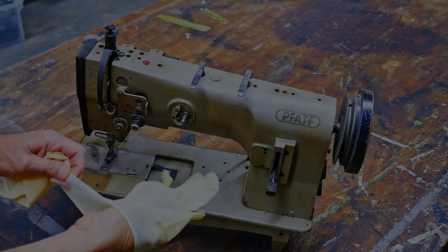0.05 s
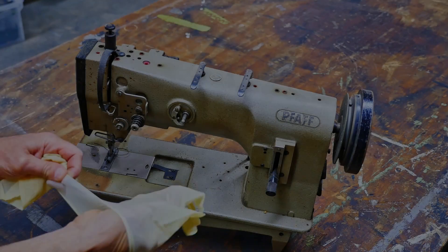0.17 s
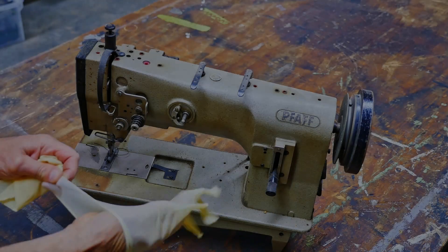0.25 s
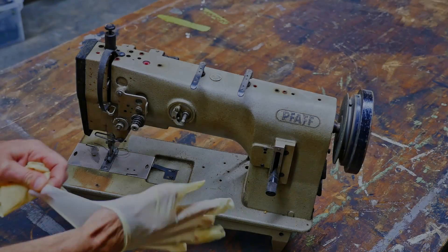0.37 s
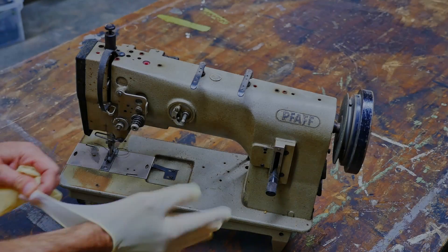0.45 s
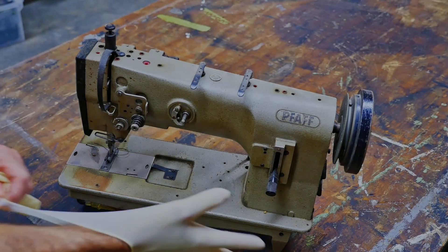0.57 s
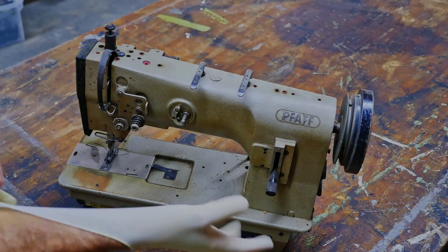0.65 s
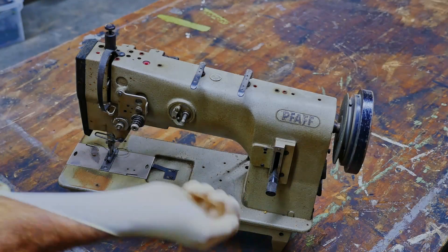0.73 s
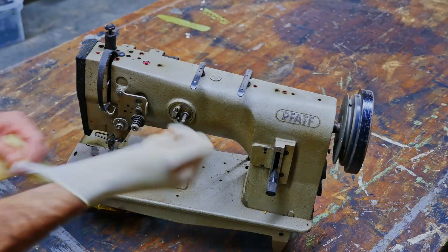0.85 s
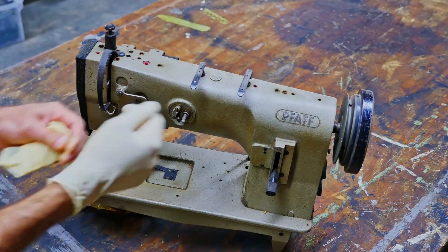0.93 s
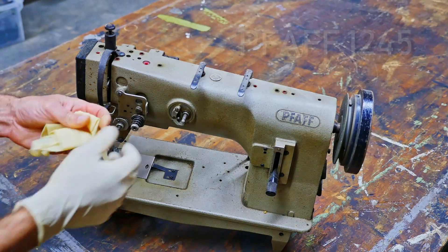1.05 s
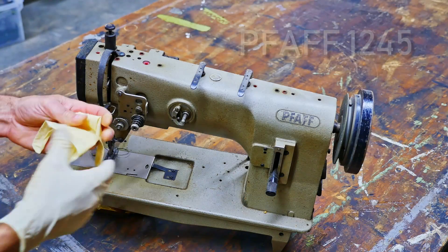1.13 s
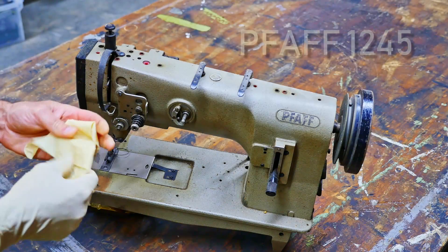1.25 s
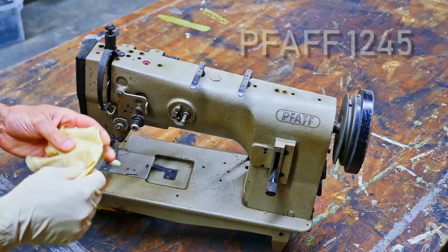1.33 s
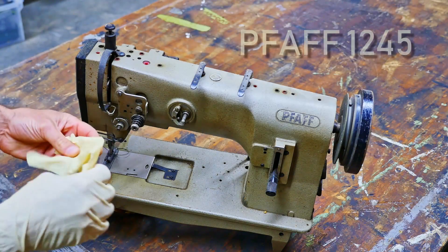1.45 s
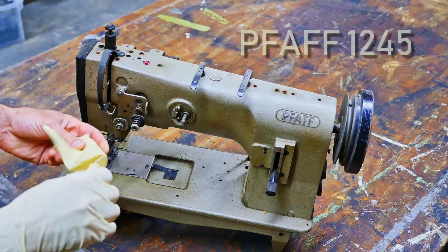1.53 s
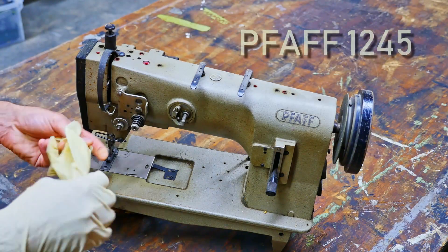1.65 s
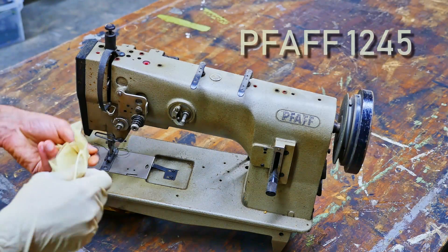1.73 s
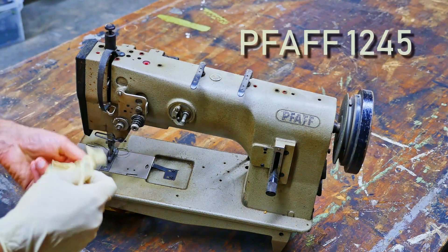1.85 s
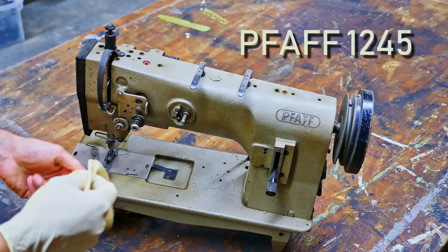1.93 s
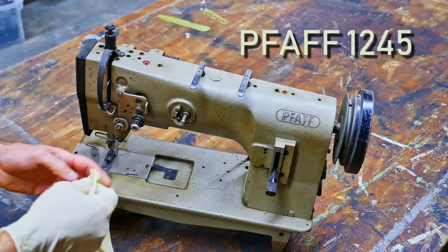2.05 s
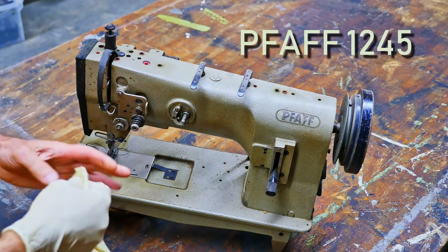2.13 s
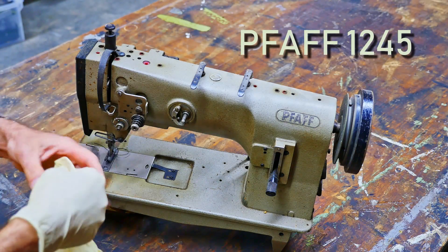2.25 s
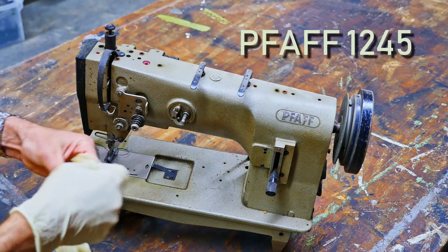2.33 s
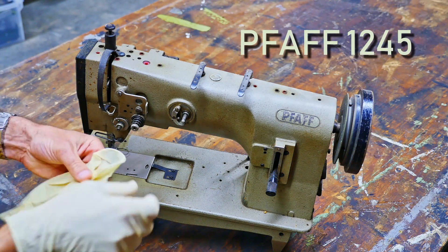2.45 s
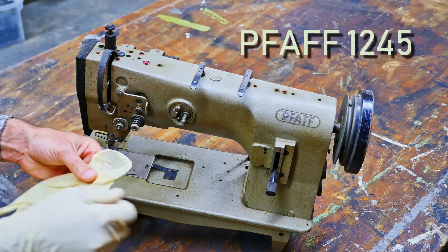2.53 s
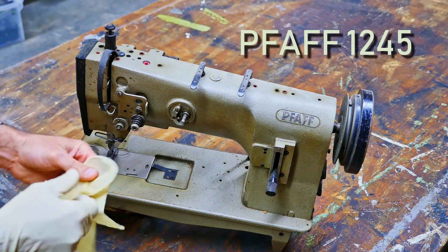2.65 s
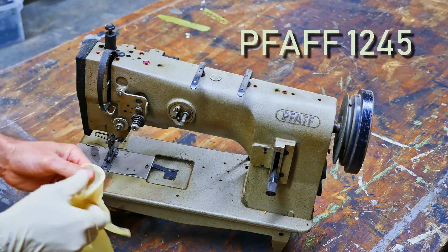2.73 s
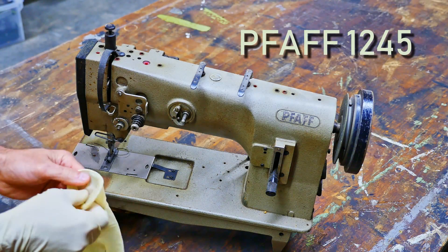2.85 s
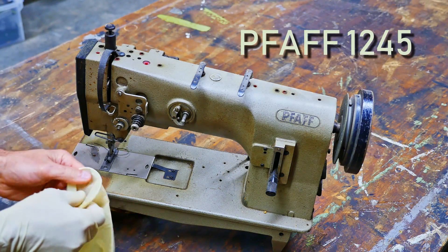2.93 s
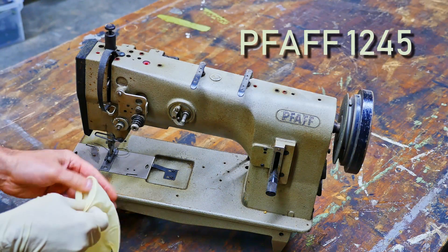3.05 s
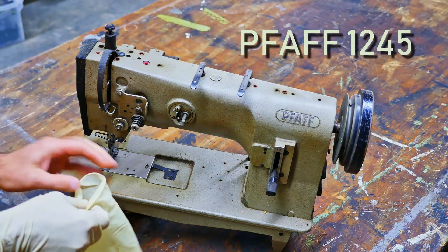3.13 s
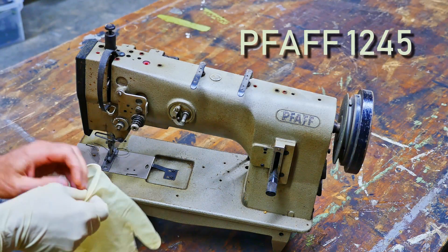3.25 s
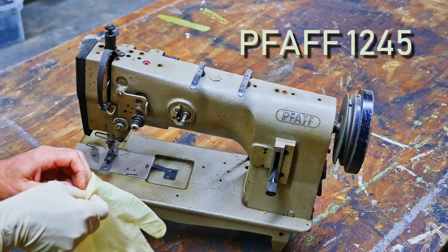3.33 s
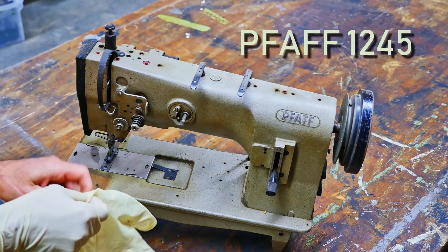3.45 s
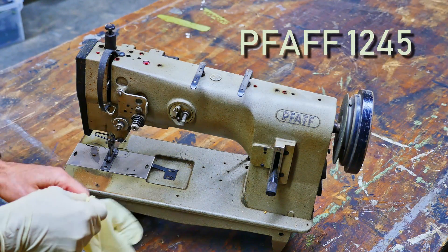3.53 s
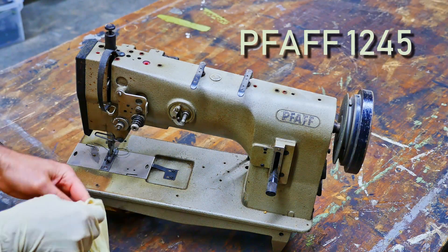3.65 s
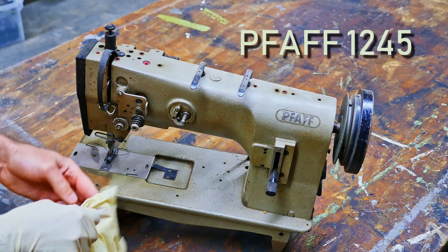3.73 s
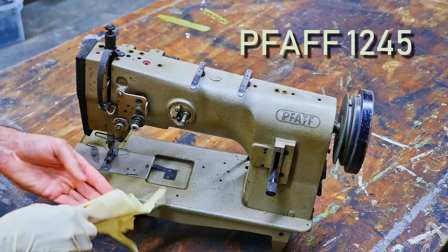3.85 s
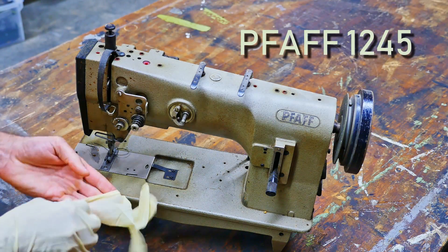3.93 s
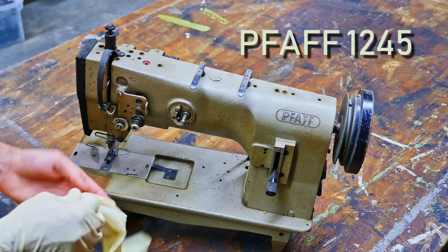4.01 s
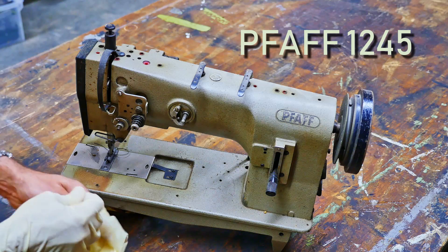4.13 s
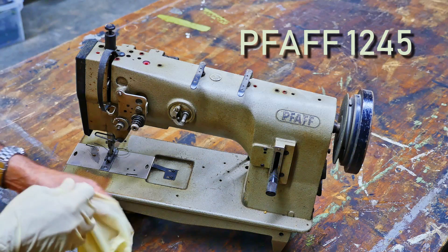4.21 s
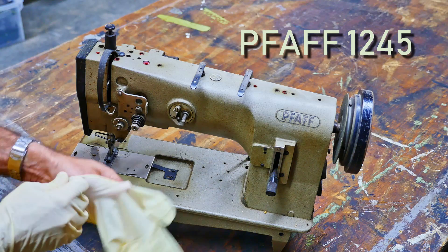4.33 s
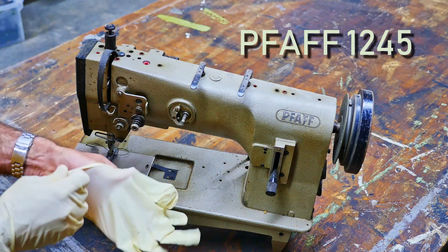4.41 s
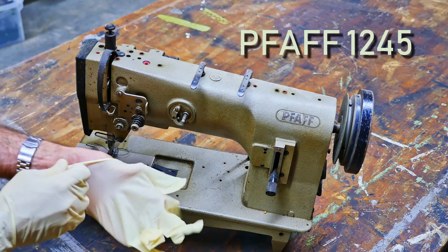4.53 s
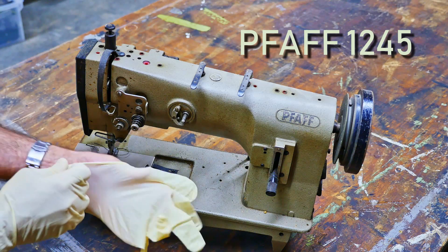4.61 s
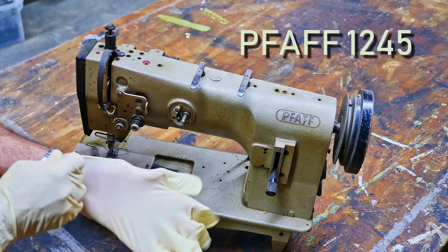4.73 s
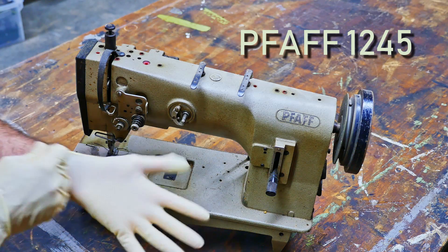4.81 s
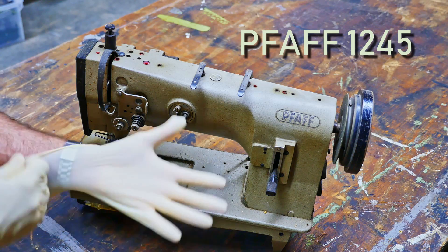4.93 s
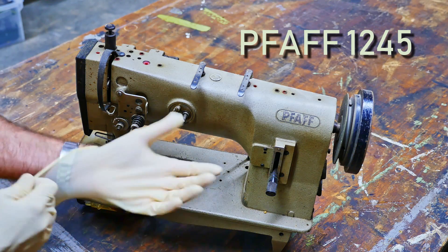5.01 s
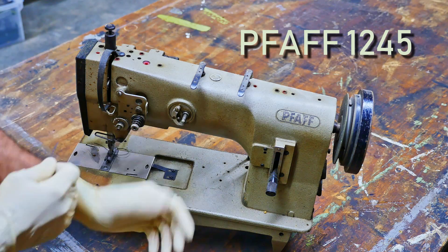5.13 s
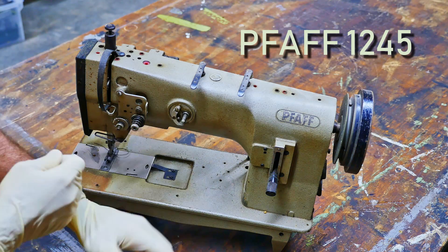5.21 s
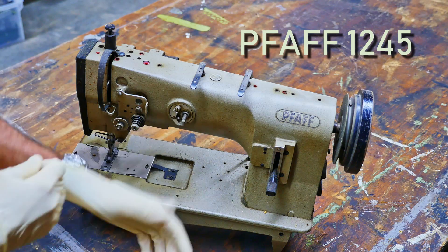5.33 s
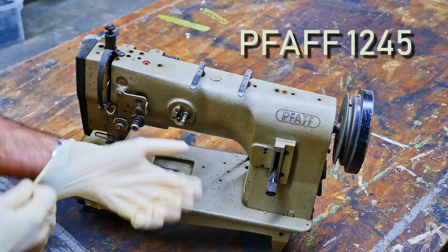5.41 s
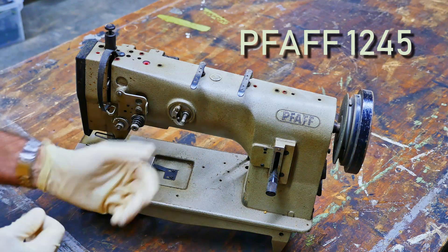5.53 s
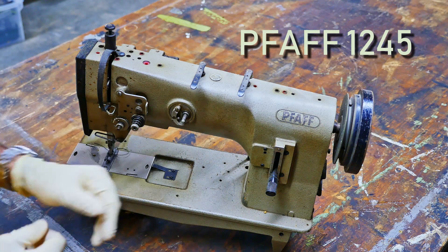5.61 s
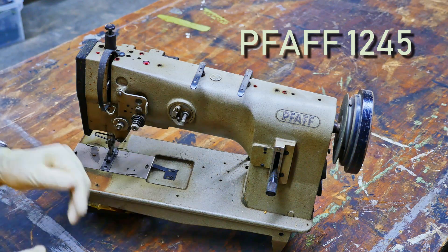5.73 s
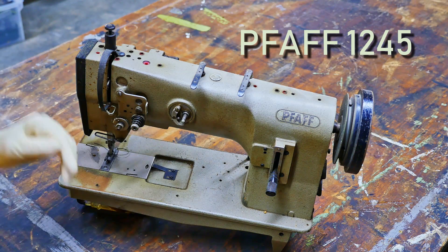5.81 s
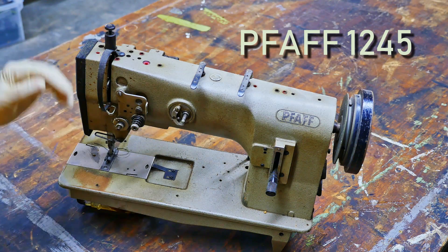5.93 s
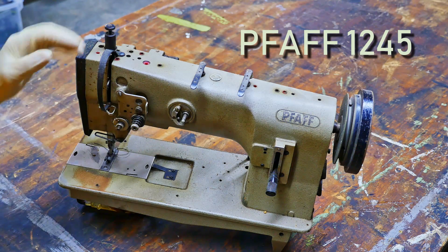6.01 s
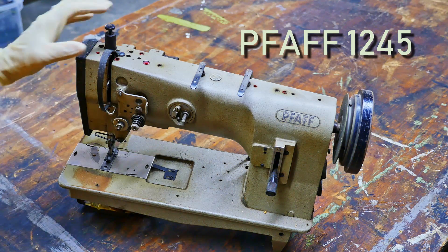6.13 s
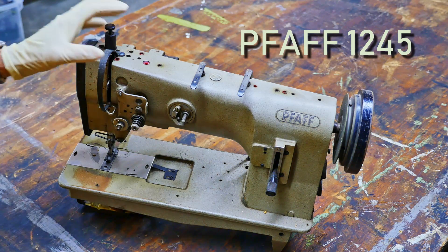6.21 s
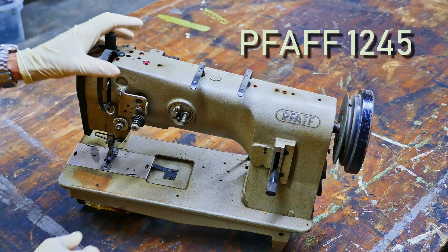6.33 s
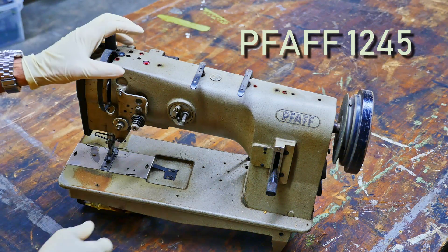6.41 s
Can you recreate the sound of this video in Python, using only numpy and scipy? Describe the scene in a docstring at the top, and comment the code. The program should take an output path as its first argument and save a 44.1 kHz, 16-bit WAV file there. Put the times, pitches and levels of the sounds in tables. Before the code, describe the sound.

Thin rubber gloves are tugged on close by, rustling, juddering and squeaking, then three sharp cuff snaps ring out in a quiet workshop.

```python
"""Pulling on thin rubber gloves

Thin rubber gloves are pulled on, close by, in a quiet workshop. Shaped noise grains rub and rustle over skin;
fading bursts of tiny slips make folds flap, fingers flop, air puff out and the glove judder over the knuckles.
Tight rubber chafes as a loose, noisy pitch and squeaks as gliding overtones; the cuff snaps as ringing clicks.
Generated reflections and a tail follow the gloves; a faint wavering hum and steady noise lie under everything."""
import sys
import numpy as np
from scipy import signal
from scipy.fft import rfft, irfft
from scipy.io import wavfile

SR = 44100
rng = np.random.default_rng(int(sys.argv[2]) if len(sys.argv) > 2 else 0)


def store_pcm(level_fs):
    """Save levels as 16-bit WAV."""
    pcm = np.round(np.clip(level_fs, -1, 1) * 32767).astype(np.int16)
    wavfile.write(sys.argv[1], SR, np.atleast_2d(pcm).T)


N = 284886
TIME = np.arange(N) / SR

# Tone of the glove's parts as the microphone hears them, with its bright peak near 5.5 kHz in the crackle:
# escaping air, slap, membrane, crackle. Each row: frequency in Hz, relative density in dB per Hz.
AIR_PUFF = [(40, -35), (110, -18), (230, -1.5), (400, 2), (600, -5.5), (1000, -28), (3000, -89)]
SLAP_TONE = [(200, -31.5), (550, -4.5), (900, 4), (1350, 9), (1800, -14), (3500, -32), (9000, -59)]
MEMBRANE_TONE = [(500, -19.5), (1200, -17.5), (1600, 8.5), (2200, 10.5), (2800, 4), (3200, -1.5),
                 (3900, -39), (9000, -36)]
CRACKLE_TONE = [(1200, -53), (3000, -9.5), (4000, -5), (4900, -1.5), (5550, 4.5), (6400, -6.5),
                (7200, -4.5), (8200, -12.5), (10000, -16), (12500, -31.5), (16000, -71.5)]


def from_db(db):
    """Decibels to gain."""
    return 10 ** (np.asarray(db) / 20)


def rms_one(x):
    """Scale to rms 1."""
    return x / np.sqrt(np.mean(x ** 2) + 1e-20)


def in_time(rows):
    """Each column of a curve after its time column, at every sample."""
    s, *columns = np.transpose(rows)
    return [np.interp(TIME, s, column) for column in columns]


def at_hz(points, hz):
    """Read a table on a log-frequency axis."""
    f, value = np.transpose(points)
    return np.interp(np.log(hz), np.log(f), value)


def drift(rate):
    """Smooth chance of spread 1, with a new target rate times a second."""
    knots = rng.standard_normal(N // 4)
    return np.interp(TIME * rate, np.arange(len(knots)), knots) / np.sqrt(2 / 3)


def response(spectrum, size=1024):
    """Causal (minimum-phase) impulse response with this spectrum; energy 1."""
    hz = np.maximum(np.fft.rfftfreq(size, 1 / SR), 1)
    cepstrum = irfft(np.log(from_db(at_hz(spectrum, hz))))
    # Folding the cepstrum onto its first half moves the energy to the start.
    cepstrum[1:size // 2] *= 2
    cepstrum[size // 2 + 1:] = 0
    h = irfft(np.exp(rfft(cepstrum)))
    return h / np.linalg.norm(h)


def colour(x, spectrum):
    """Give a signal the tone of this spectrum."""
    return signal.fftconvolve(x, response(spectrum))[:len(x)]


def band_filter(edges_hz):
    """Band-pass sections between two edges."""
    return signal.butter(2, edges_hz, "band", fs=SR, output="sos")


def stereo(mid, side):
    """Left and right from mid and side."""
    return np.array([mid + side, mid - side])


def add(track, s, sound):
    """Mix a sound into a track at a time in seconds."""
    start = round(s * SR)
    track[start:start + len(sound)] += sound[:N - start]


def slips(per_s, spread_db, size):
    """Tiny releases at random moments, uneven in strength."""
    born = rng.random(size) < per_s / SR
    sign = rng.choice([-1, 1], size)
    strength = from_db(spread_db * np.minimum(rng.exponential(1, size), 4))
    return born * sign * strength


def burst(fade_s, levels_db, parts=(AIR_PUFF, SLAP_TONE, MEMBRANE_TONE, CRACKLE_TONE),
          rise_s=0.00016, slips_per_s=11000, spread_db=2.5, size=4096):
    """Rubber lets go in a fading burst of slips, heard in the tones of the glove's parts."""
    fade_s = max(fade_s, .001)
    t = TIME[:size]
    envelope = np.exp(-t / fade_s) * (1 - np.exp(-t / rise_s))
    release = slips(slips_per_s, spread_db, size) * envelope
    sounds = [colour(release, part) for part in parts]
    mix = sum(from_db(db) * x / np.linalg.norm(x) for db, x in zip(levels_db, sounds))
    return mix * np.sqrt(fade_s * SR / 2)  # a longer fade carries more energy


def ringing(hz, width_hz, size=2048):
    """A click rings a band of close modes; peak 1."""
    edges = np.clip([hz - width_hz / 2, hz + width_hz / 2], 30, .45 * SR)
    ring = signal.sosfilt(band_filter(edges), signal.unit_impulse(size))
    return ring / np.abs(ring).max()


def background(waver_db=0.5, wander=0.23):
    """Steady shaped room noise with a hum that wavers slightly in level and phase."""
    # Each row: frequency in Hz, relative density in dB per Hz.
    floor_tone = [(15, -51), (25, -26), (123, -1), (180, -4.5), (229, 0), (309, -2.5), (503, -8.5),
                  (591, -5), (962, -10), (1840, -10), (3250, -15), (5430, -10), (7510, -16.5),
                  (14400, -32.5), (16000, -48)]
    # Each row: frequency in Hz, side against mid in dB.
    floor_side = [(40, -4), (120, 1.5), (290, 5.5), (700, 4), (2500, -2), (5500, -7.5), (8000, -7),
                  (13000, -1.5)]
    # Each row: hum frequency in Hz, level in dB.
    hum_tones = [(240, -67.5), (297, -64), (594, -81)]
    floor_db = -56  # rms of the mid
    freqs = np.maximum(np.fft.rfftfreq(N, 1 / SR), 1)
    mid, side = rfft(rng.standard_normal((2, N))) * from_db(at_hz(floor_tone, freqs))
    mid, side = irfft(mid, N), irfft(side * from_db(at_hz(floor_side, freqs)), N)
    hum = np.zeros(N)
    for hz, db in hum_tones:
        level = np.sqrt(2) * from_db(db + waver_db * drift(20))
        hum += level * np.sin(2 * np.pi * hz * TIME + wander * drift(14))
    return from_db(floor_db) * stereo(mid, side) / np.std(mid) + hum


def workshop(x, early_db=-7, early_s=0.009, tail_db=-10, build_s=0.018, gap_s=0.0015, size=32768):
    """Quick reflections off bench and machine; then a tail, held up at first as by a recorder's
    gain control, dies band by band."""
    # Each row: frequency in Hz, side against mid in dB.
    room_side = [(60, -5), (130, -2), (300, -8), (700, -1), (2400, -3.5), (5300, -11), (8000, -13),
                 (13000, 8.5)]
    # Each row: frequency in Hz, time for the tail to fall 60 dB in seconds.
    tail_t60 = [(100, 0.52), (500, 0.92), (2200, 0.51), (5500, 0.47), (12000, 0.31)]
    t, echo = TIME[:size], np.zeros((2, size))
    early = np.array([slips(6000, 2.1, size) for _ in range(2)])
    early *= np.exp(-t / early_s) * (t > gap_s)
    early *= from_db(early_db) / np.linalg.norm(early, axis=1, keepdims=True)
    edges = np.geomspace(60, 18000, 13)
    for low, high in zip(edges, edges[1:]):
        hz = np.sqrt(low * high)
        shape = from_db(-60 * t / at_hz(tail_t60, hz)) * (1 - np.exp(-t / build_s))
        tail = from_db(tail_db) * rng.standard_normal((2, size)) * shape / np.linalg.norm(shape)
        mid, side = signal.sosfilt(band_filter([low, high]), early + tail)
        echo += stereo(mid, side * from_db(at_hz(room_side, hz)))
    return signal.fftconvolve(x[None], echo, axes=1)[:, :N]


def effort():
    """Gain of the rubbing: the two long pulls and the short strokes, summed in power."""
    # A hand pushes into its glove, one curve for each hand.
    # Each row of a curve: time in seconds, level of the rubbing in dB.
    pulls = [
        [(0, -43), (.16, -42), (.22, -48), (.42, -45.5), (.5, -38.5), (.58, -44.5), (.68, -34), (.77, -43),
         (.99, -45), (1.07, -57)],
        [(3.66, -55.5), (3.78, -49), (3.98, -51.5), (4.12, -47.5), (4.68, -47), (4.82, -43), (4.9, -34),
         (5.03, -49.5), (5.2, -48)],
    ]
    # Short strokes of fingers over rubber. Each row: middle in seconds, length in seconds, level in dB.
    strokes = [(1.164, 0.18, -52), (1.32, 0.19, -48.5), (1.47, 0.26, -50), (1.612, 0.21, -50),
               (1.773, 0.27, -52.5), (1.94, 0.22, -55.5), (2.22, 0.27, -63.5), (2.384, 0.17, -50.5),
               (2.576, 0.1, -55), (2.742, 0.23, -55.5), (2.898, 0.13, -56), (3.066, .15, -51.5),
               (3.416, 0.27, -56), (3.582, 0.18, -50.5), (5.244, 0.12, -39), (5.438, 0.2, -37),
               (5.548, 0.086, -38), (6.112, 0.12, -57), (6.41, 0.1, -53)]
    stroke_shape = 0.86  # a stroke swells and fades as half a sine to this power
    power = np.full(N, 1e-9)
    for curve in pulls:
        on = (TIME >= curve[0][0]) & (TIME < curve[-1][0])
        power += from_db(in_time(curve)[0]) ** 2 * on
    for s, length_s, level_db in strokes:
        on = np.abs(TIME - s) < length_s / 2
        swell = np.abs(np.cos(np.pi * (TIME[on] - s) / length_s)) ** stroke_shape
        power[on] += (from_db(level_db) * swell) ** 2
    return np.sqrt(power)


def rubbing(gain, rustle_flutter_db=1.8, hiss_flutter_db=1.15):
    """Wrinkles rustle in coarse grains; the skin's fine texture hisses. A light touch mostly hisses."""
    # Tone of the rustle, then of the hiss with the microphone's bright peak near 5.5 kHz.
    # Each row: frequency in Hz, relative density in dB per Hz.
    rustle_tone = [(60, -17), (150, -7.5), (280, 1.5), (600, -2.5), (900, -4.5), (1400, -2), (1900, -0.5),
                   (2500, -1), (3300, -4.5), (5500, -11), (14000, -59)]
    hiss_tone = [(1000, -27), (3000, -11.5), (4200, -11.5), (4900, -2.5), (5500, 1), (6400, -7), (7300, -4),
                 (8200, -11.5), (10000, -13.5), (12500, -31.5), (16000, -53)]
    rustle_db, firm_db = -1.96, -47  # rustle against hiss under a firm grip; level of that grip
    rustle_loss = 0.83  # dB the rustle further loses per dB of a lighter touch
    grip = drift(110)  # the rubber catches and lets go
    rustle = slips(3000, 1.86, N) * from_db(rustle_flutter_db * grip)
    rustle = rms_one(colour(rustle, rustle_tone))
    hiss = slips(16000, 1.4, N) * from_db(hiss_flutter_db * grip)
    hiss = rms_one(colour(hiss, hiss_tone))
    firmness = np.minimum(gain / from_db(firm_db), 1)
    return gain * (from_db(rustle_db) * firmness ** rustle_loss * rustle + hiss)


def chafing(width_hz=750, catch_db=3.5):
    """Slips too irregular for a clean note: only a loose pitch remains, broken as the rubber catches."""
    # Tight rubber creeps over skin, a hoarse half-squeak for each curve.
    # Each row of a curve: time in seconds, pitch in Hz, level in dB.
    chafes = [
        [(.13, 1360, -62), (.18, 1330, -59), (.25, 1323, -53), (.31, 1302, -58)],
        [(4.3, 1148, -59), (4.345, 1150, -48), (4.4, 1199, -55), (4.5, 1342, -50), (4.6, 1445, -59),
         (4.7, 1517, -51), (4.8, 1588, -42), (4.87, 1580, -54)],
    ]
    out = np.zeros(N)
    for curve in chafes:
        hz, level_db = in_time(curve)
        on = (TIME > curve[0][0]) & (TIME < curve[-1][0])
        phase = 2 * np.pi * np.cumsum(hz) / SR
        level = on * from_db(level_db + catch_db * drift(90))
        # Two independent drifts smear the note into a band of noise.
        out += level * (drift(width_hz) * np.cos(phase) + drift(width_hz) * np.sin(phase))
    return out


def flapping(gain):
    """Folds flip over, small ones at random moments; empty fingers flop and trapped air puffs out."""
    # Folds flip against the hand. Each row: start in seconds, fade in seconds, level in dB,
    # sharpness (extra crackle) in dB.
    folds = [(.274, 0.0096, -34, -6), (0.3646, 0.0046, -31.5, -10), (.379, 0.009, -38.5, -7),
             (.467, 0.0085, -35.5, 9.5), (.515, 0.0098, -33, 4), (.611, 0.0047, -35, 5),
             (0.803, 0.0096, -39.5, 10.5), (0.8708, 0.0065, -27, 10.5), (0.8763, 0.0062, -36, 23),
             (.942, 0.0042, -38, -3), (.974, 0.0049, -35, 2), (0.9799, 0.0074, -35.5, 15.5),
             (1.927, 0.0052, -40.5, -9), (2.364, 0.0097, -48, -1), (2.385, 0.0085, -50, 15),
             (3.346, 0.0058, -40, -4), (3.443, 0.007, -43.5, -6), (3.548, 0.0057, -41, -7),
             (3.605, .008, -49.5, -3), (3.817, 0.0044, -33.5, -4), (3.869, 0.0058, -42, 1),
             (3.998, .005, -45.5, -7), (4.181, 0.011, -39.5, -13), (4.294, .006, -48.5, 13),
             (4.36, 0.0079, -41, -4), (4.491, 0.016, -39, 5), (4.604, 0.012, -41.5, -1),
             (4.795, .013, -37, -8), (4.866, .01, -29, -2), (4.8794, 0.011, -21.5, 1.5),
             (4.895, 0.012, -33.5, 16), (5.2231, 0.0074, -35.5, 14), (5.238, 0.0068, -38, -2),
             (5.531, 0.0054, -26, -1)]
    # Air puff, slap, membrane and crackle of a fold, against its level, in dB.
    fold_parts_db = [-11.5, -7, 0.5, -4.5]
    # Trapped air escapes at the cuff. Each row: start in seconds, fade in seconds, level in dB.
    puffs = [(.311, 0.003, -35), (0.348, 0.0029, -38.5), (0.378, .005, -37), (0.477, 0.013, -36),
             (.802, 0.0094, -37), (0.963, 0.0048, -32.5), (.974, 0.0026, -38), (3.817, 0.0043, -43.5),
             (4.411, 0.0094, -41.5), (4.491, .014, -40), (4.976, 0.019, -38), (5.2227, .005, -43),
             (5.243, 0.014, -35)]
    # Empty fingers of the second glove flop over. Each row: start in seconds, fade in seconds, level in dB.
    flops = [(4.069, 0.0046, -45), (4.294, .006, -41), (4.342, .0085, -33), (4.361, .009, -41),
             (4.411, .006, -43), (4.491, 0.017, -34), (4.554, .005, -43)]
    # Count over the scene, level against the rubbing, fade.
    small_folds, small_fold_db, small_fold_fade_s = 70, -1, 0.0063
    small = []
    for i in rng.integers(0, N, size=small_folds):
        small.append((i / SR, small_fold_fade_s, 20 * np.log10(gain[i]) + small_fold_db, 0))
    out = np.zeros(N)
    for s, fade_s, level_db, sharpness_db in [*folds, *small]:
        parts_db = np.add(fold_parts_db, [0, 0, 0, sharpness_db]) + level_db
        add(out, s, burst(fade_s, parts_db))
    for events, part in ((puffs, AIR_PUFF), (flops, SLAP_TONE)):
        for s, fade_s, level_db in events:
            add(out, s, burst(fade_s, [level_db], [part]))
    return out


def juddering():
    """The first glove catches and lets go evenly over the knuckles, the later catches weaker and duller."""
    # Levels of air puff, slap, membrane and crackle in dB; the crackle fades over the run.
    judder_parts_db = [-49, -34, -28, -19]
    start_s, step_s, catches, fade_s = .6335, .0176, 6, 0.01
    hold_s, dulling_db_per_s = 0.043, 186  # the crackle holds, then dies away
    out = np.zeros(N)
    *body_db, crackle_db = judder_parts_db
    for t in step_s * np.arange(catches):
        dulling_db = dulling_db_per_s * max(t - hold_s, 0)
        add(out, start_s + t, burst(fade_s, [*body_db, crackle_db - dulling_db]))
    return out


def squeaking(jitter=.085, shimmer_db=6.0):
    """Tight rubber sticks and slips at an audible, rising rate; an unsteady grip makes it rasp."""
    # Each row: loudest moment in seconds, rise in seconds, fall in seconds, slips per second, level in dB,
    # roughness at the loudest moment (0-1).
    squeaks = [(.574, .021, .01, 1606, -24.5, .13), (4.901, .01, 0.039, 1355, -18.5, .25),
               (4.941, .035, 0.025, 1600, -27.5, 0.36)]
    # Overtones, one list for each squeak. Each row: multiple of the slip rate, relative level in dB.
    squeak_harmonics = [
        [(1, -8), (2, 2), (3, -7), (4, -1.5), (5, -30), (6, -22)],
        [(1, -6.5), (2, -1), (3, -8), (4, 0.5), (5, -14), (6, -27), (7, -21)],
        [(1, -6), (2, 1), (3, -2), (4, -20), (5, -16)],
    ]
    range_db = 17.5  # lost over the rise or the fall
    # Pitch climbs by this share either side of the peak, over about this time, as the rubber tightens.
    glide, glide_s = 0.044, 0.015
    rasp = 2.2  # roughness gains this many times itself towards the ends, where the grip is unsteady
    out = np.zeros(N)
    for (s, rise_s, fall_s, hz, level_db, roughness), harmonics in zip(squeaks, squeak_harmonics):
        on = (TIME > s - rise_s) & (TIME < s + fall_s)
        t = TIME[on] - s
        away = np.maximum(-t / rise_s, t / fall_s)  # 0 at the peak, 1 at either end
        rough = roughness * (1 + rasp * away)
        rate = hz * (1 + glide * np.tanh(t / glide_s) + jitter * rough * drift(1500)[on])
        phase = 2 * np.pi * np.cumsum(rate) / SR
        tone = np.zeros(len(t))
        for k, db in harmonics:
            tone += from_db(db) * np.sin(round(k) * phase + rng.uniform(0, 2 * np.pi))
        shimmer = shimmer_db * rough * drift(700)[on]
        out[on] += rms_one(tone) * from_db(level_db - range_db * away + shimmer)
    return out


def snapping(thud_width_hz=330, thud_db=-18):
    """The cuff whips in; a hard blow rings the taut rubber and squeezes out a puff of air; then it settles."""
    # The stretched cuff hits the wrist. Each row: hit in seconds, flight in seconds, crackle in flight in dB,
    # membrane in Hz, membrane width in Hz, membrane level in dB, crack in Hz, crack width in Hz,
    # crack level in dB, thud in Hz.
    snaps = [(5.3956, 0.0046, -17, 1950, 890, -7.5, 4860, 1300, 0, 450),
             (5.5062, .0048, -11, 2130, 1050, -25, 5650, 1200, -4.5, 420),
             (5.593, 0.00141, -16, 2260, 870, 0.5, 5970, 3440, -2.5, 383)]
    # The cuff in flight: air puff, slap and membrane in dB.
    whip_parts_db = [-27.5, -23, -16]
    settle_delay_s, settle_fade_s = .002, 0.012  # it flutters against the wrist after the hit
    settle_puff_db, settle_slap_db = -31, -31
    settle_membrane_db, settle_crackle_db = -24, -15  # against the hit's membrane and crack
    out = np.zeros(N)
    for (s, flight_s, crackle_db, membrane_hz, membrane_width_hz, membrane_db,
         crack_hz, crack_width_hz, crack_db, thud_hz) in snaps:
        whip = burst(flight_s, [*whip_parts_db, crackle_db], rise_s=flight_s / 2)
        add(out, s - flight_s, whip)
        add(out, s, from_db(membrane_db) * ringing(membrane_hz, membrane_width_hz))
        add(out, s, from_db(crack_db) * ringing(crack_hz, crack_width_hz))
        thud_gain = from_db(max(membrane_db, crack_db) + thud_db)
        add(out, s, thud_gain * ringing(thud_hz, thud_width_hz))
        settle_db = [settle_puff_db, settle_slap_db,
                     membrane_db + settle_membrane_db, crack_db + settle_crackle_db]
        add(out, s + settle_delay_s, burst(settle_fade_s, settle_db))
    return out


def scene():
    """The gloves are straight ahead, their reflections and tail all round."""
    glove_low_hz = 85.5  # a small, thin glove radiates little bass
    gain = effort()
    gloves = rubbing(gain) + chafing() + flapping(gain) + juddering() + squeaking() + snapping()
    gloves = signal.sosfilt(signal.butter(2, glove_low_hz, "high", fs=SR, output="sos"), gloves)
    return background() + workshop(gloves) + gloves


def record(dry, top=1.0, cutoff_hz=15300):
    """The hardest peaks overload; the treble above the cutoff is removed."""
    treble_cut = signal.ellip(10, .1, 80, cutoff_hz, fs=SR, output="sos")
    return signal.sosfilt(treble_cut, np.clip(dry, -top, top))


dry = scene()
out = record(dry)
store_pcm(out)
```